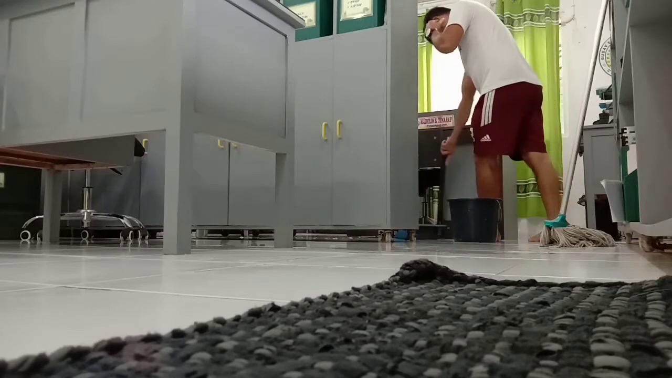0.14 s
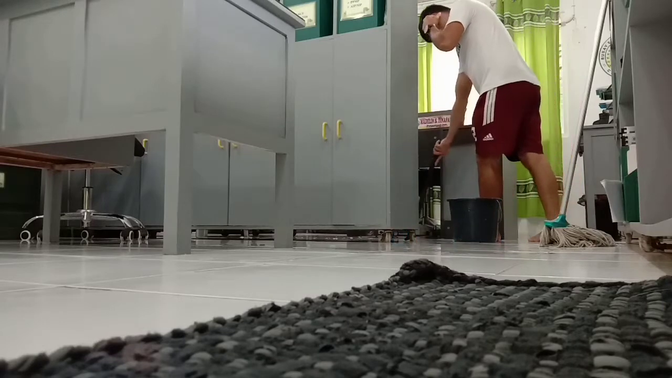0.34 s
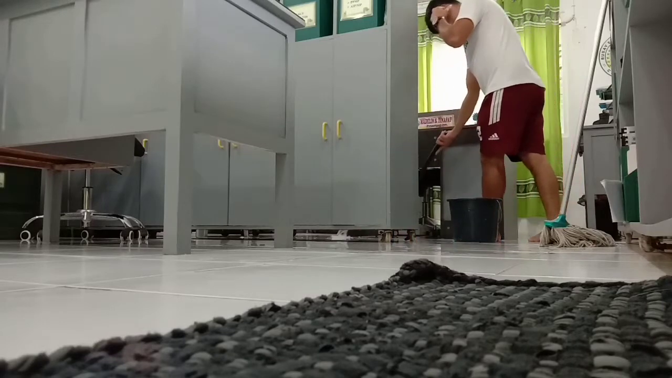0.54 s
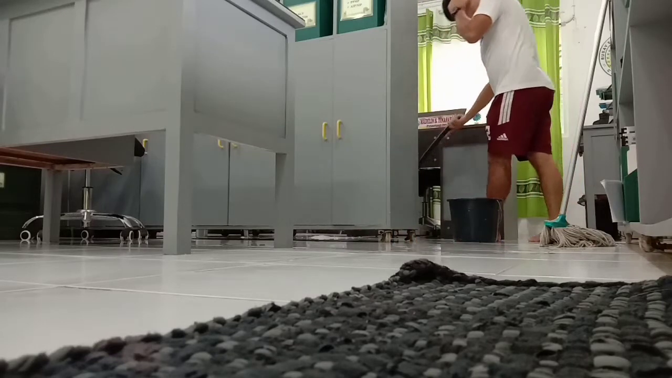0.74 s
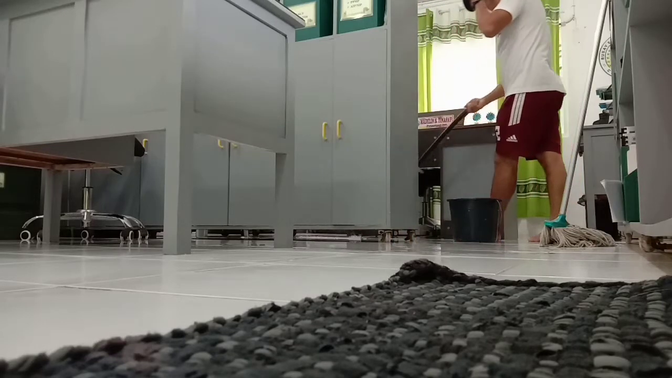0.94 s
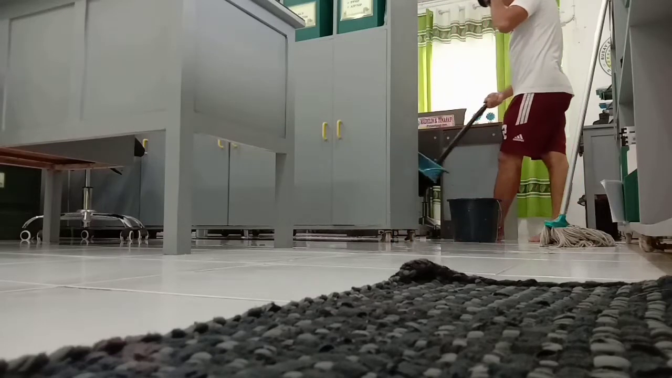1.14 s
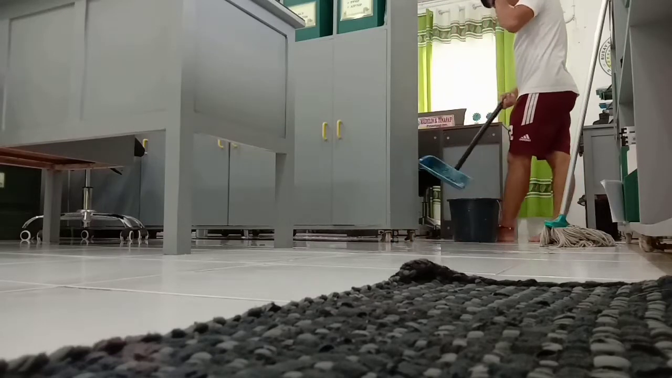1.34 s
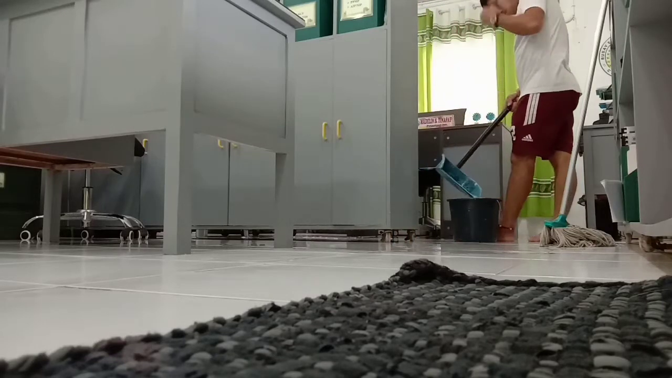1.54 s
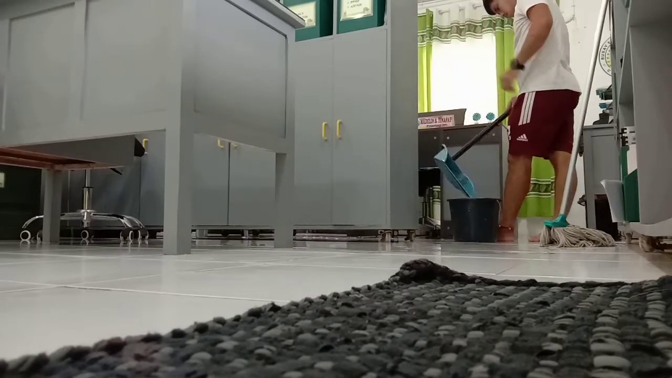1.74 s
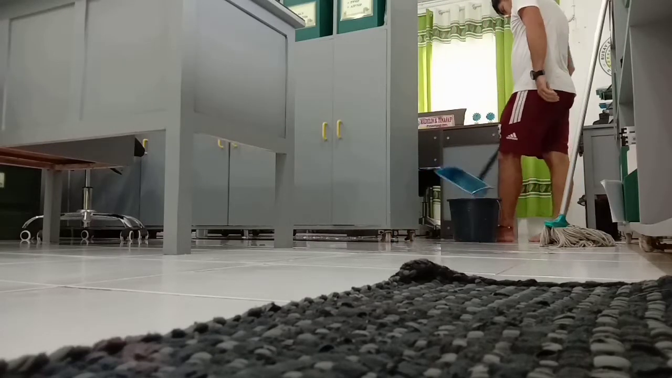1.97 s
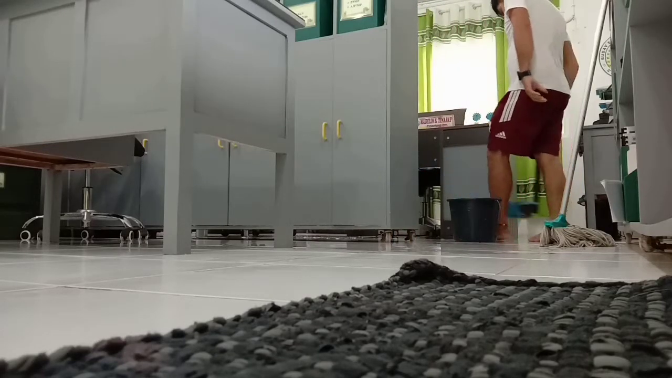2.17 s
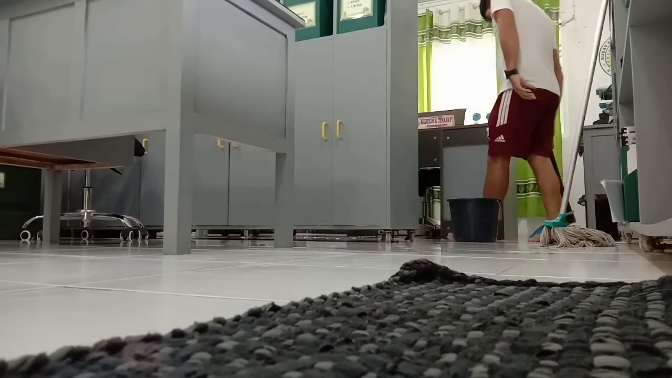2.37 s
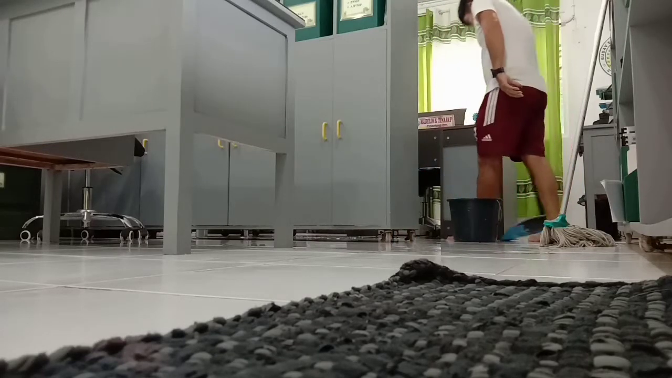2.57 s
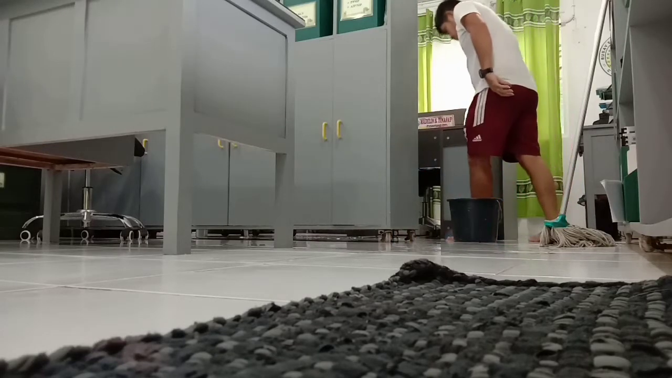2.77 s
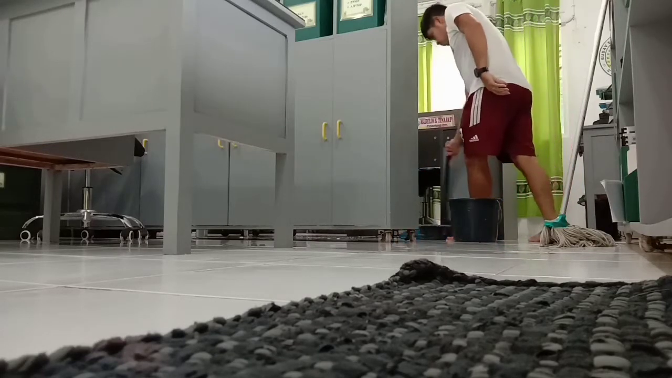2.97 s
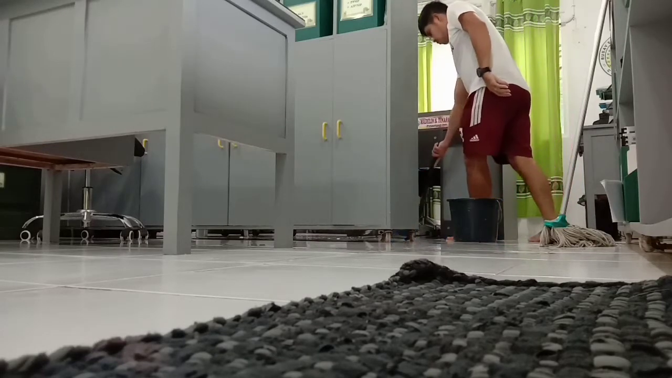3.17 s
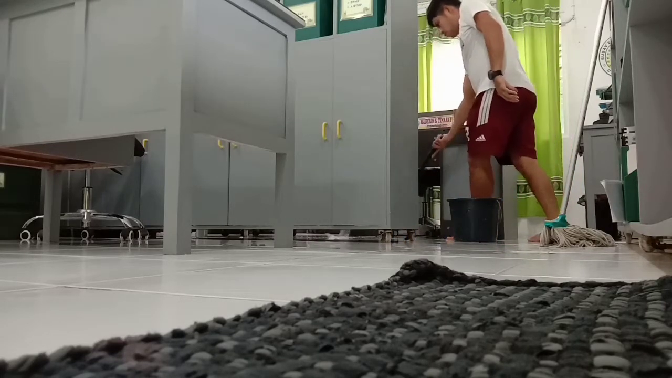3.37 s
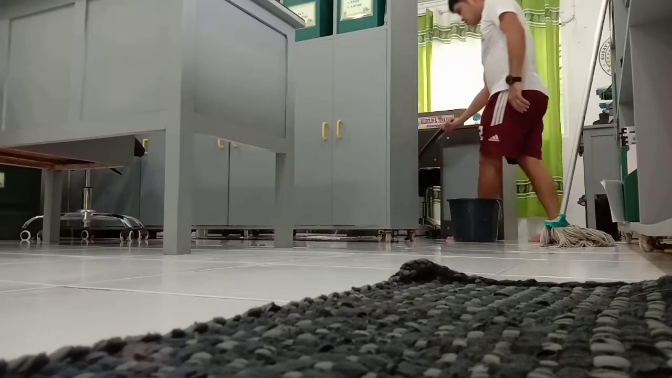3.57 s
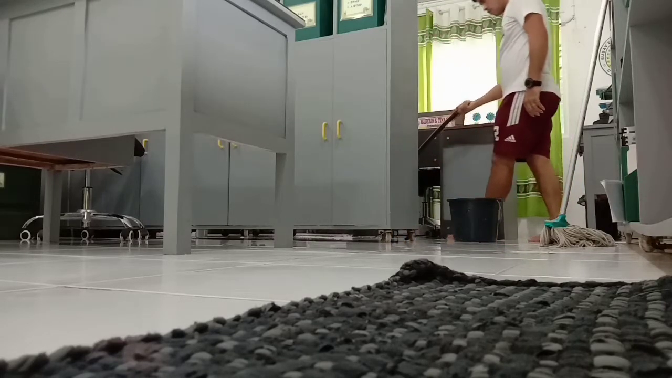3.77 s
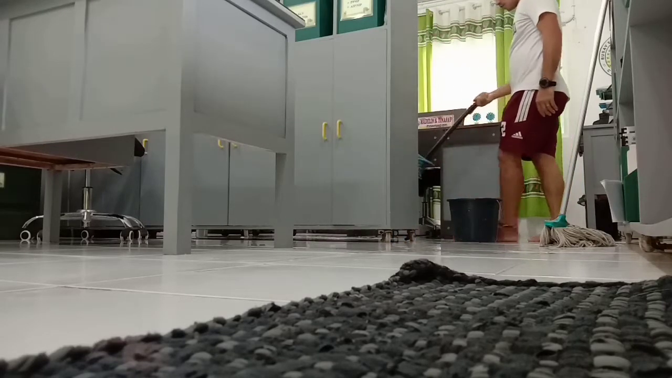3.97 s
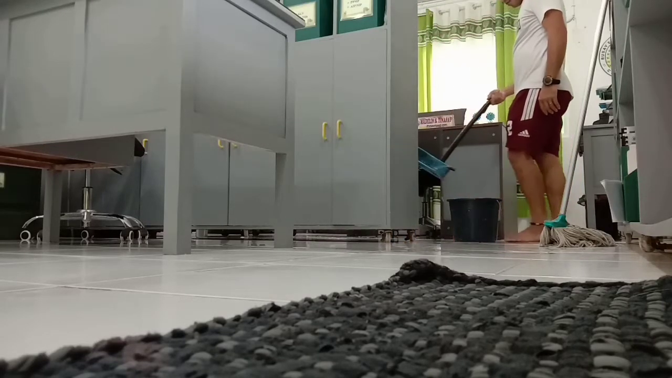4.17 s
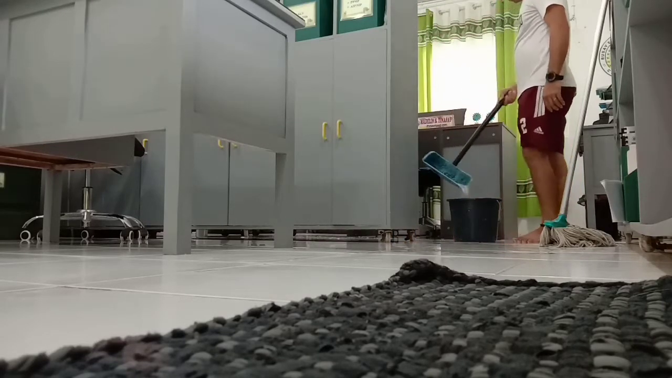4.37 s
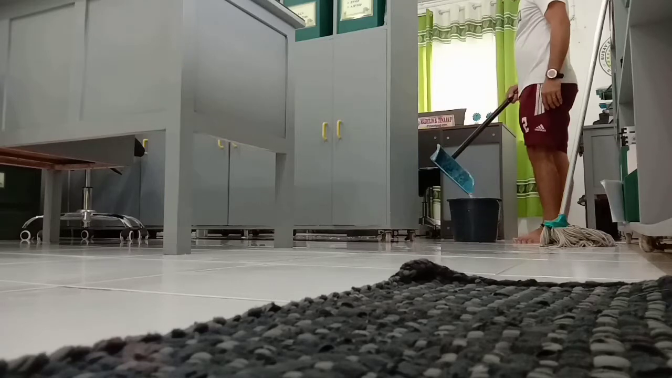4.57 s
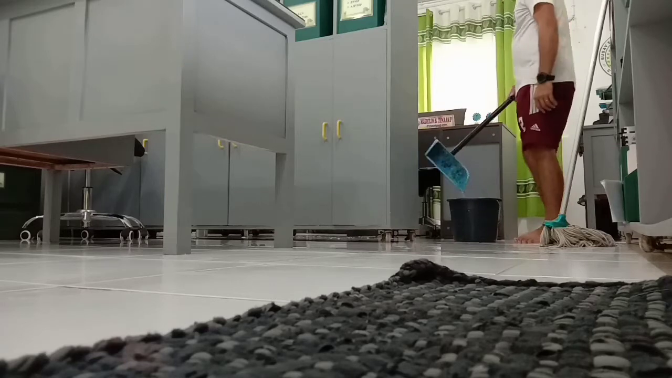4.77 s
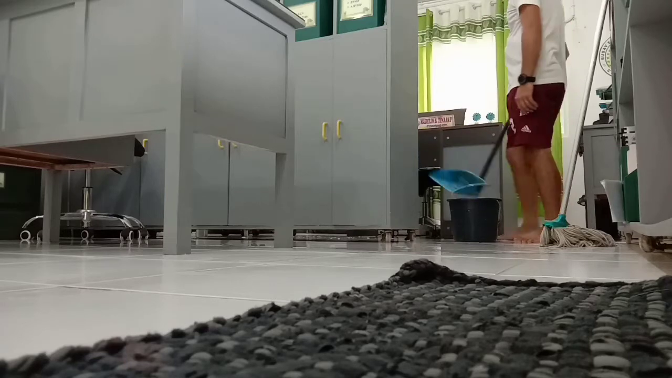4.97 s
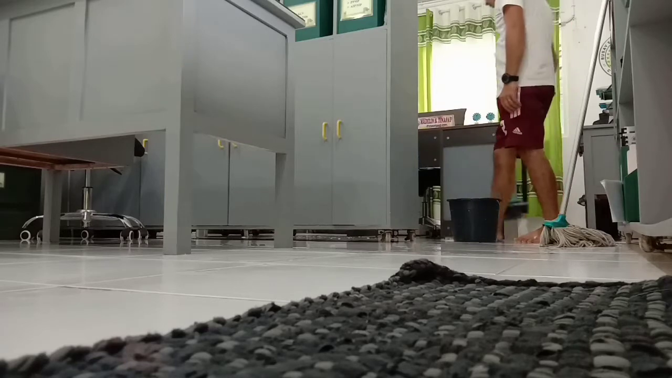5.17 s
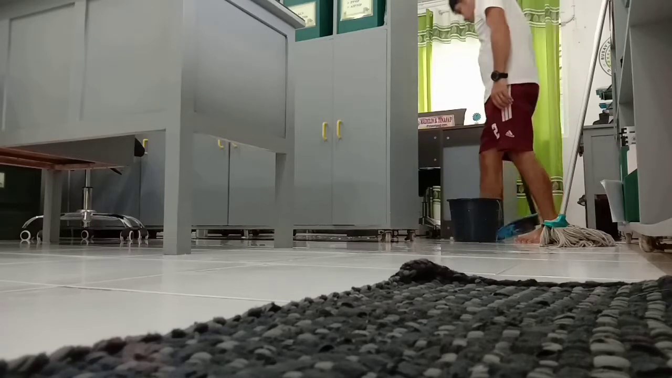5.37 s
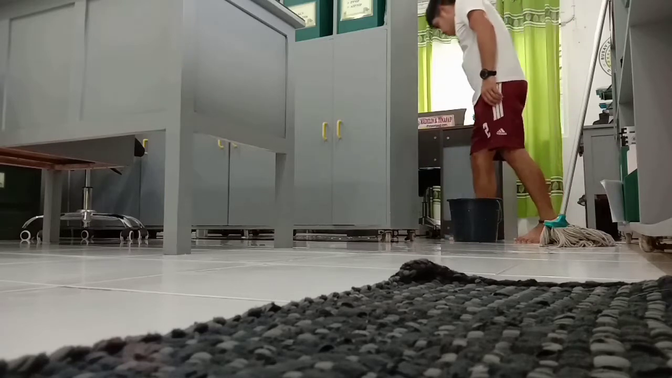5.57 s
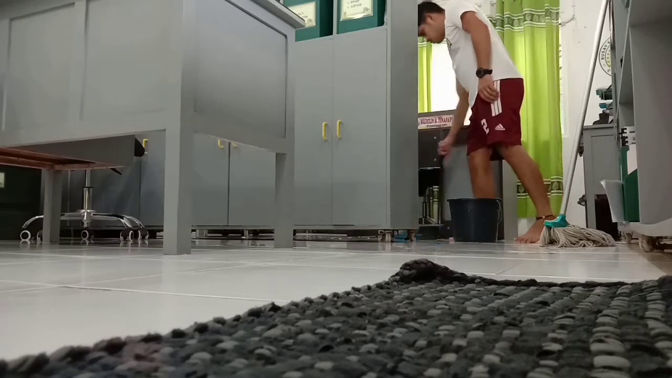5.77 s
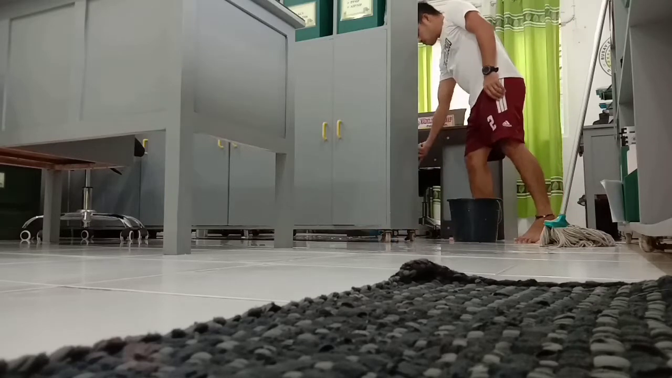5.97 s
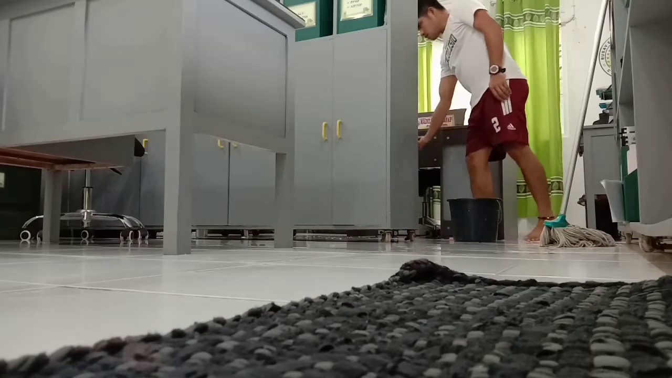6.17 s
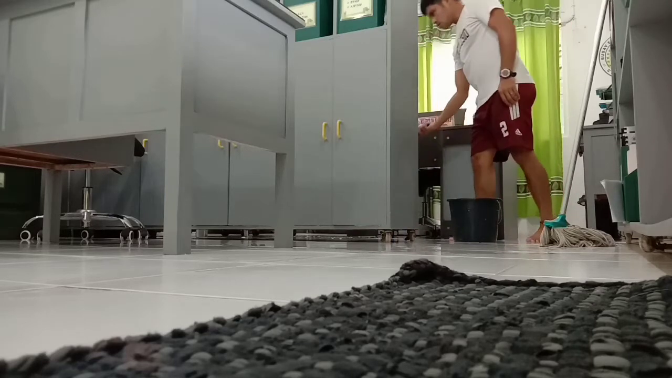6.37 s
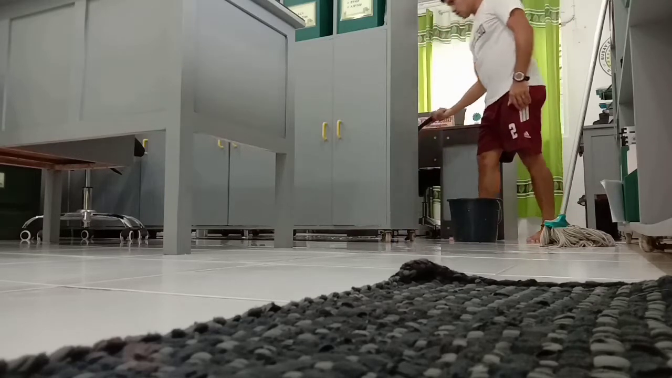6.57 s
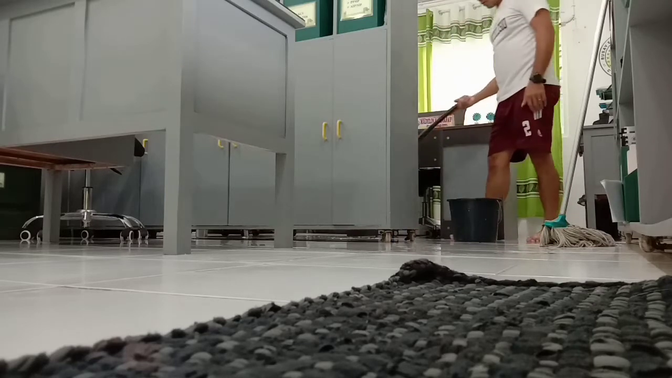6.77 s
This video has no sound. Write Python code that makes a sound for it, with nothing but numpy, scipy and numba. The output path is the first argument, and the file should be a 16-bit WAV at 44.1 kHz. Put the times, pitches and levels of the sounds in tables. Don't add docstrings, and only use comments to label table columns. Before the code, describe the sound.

Short hollow plastic knocks, a scrape, light trickling drops, then a splashing, gurgling pour into a bucket. The pattern repeats with harder banging and longer scraping, a second pour, and a final bright crack and scrape before quiet with a few drops and a faint distant bird. Heard from floor level in a reverberant room, treble dulled and mids boxy, over soft rain noise and faint mains hum.

```python
import sys
import numpy as np
from scipy import signal
from scipy.fft import rfft, irfft
from scipy.io import wavfile
from scipy.ndimage import uniform_filter1d
from numba import njit

SR = 44100
rng = np.random.default_rng(int(sys.argv[2]) if len(sys.argv) > 2 else 0)


def amplitude_ratio(level_db):
    exponent = np.asarray(level_db, float) / 20
    return 10 ** exponent


def bounce(signal):
    frames = np.transpose(np.atleast_2d(signal))
    limited = np.clip(frames, -1, 1)
    pcm = np.round(limited * 32767).astype(np.int16)
    wavfile.write(sys.argv[1], SR, pcm)


N = 300762


def level(x, db):
    return x * amplitude_ratio(db) / np.sqrt(np.mean(x ** 2))


def on_log(points, hz):
    point_hz, value = np.array(points).T
    return np.interp(np.log(hz + 1), np.log(point_hz), value)


def colour(x, points):
    cep = irfft(np.log(amplitude_ratio(on_log(points, np.arange(4097) * SR / 8192))))
    cep[1:4096] *= 2
    cep[4097:] = 0
    return signal.fftconvolve(x, irfft(np.exp(rfft(cep))))[:len(x)]


def band(x, lo_hz, hi_hz, order=2):
    return signal.sosfilt(signal.butter(order, [lo_hz, hi_hz], "band", fs=SR, output="sos"), x)


def walk(rate_hz):
    hold = int(SR / rate_hz)
    steps = np.repeat(rng.standard_normal(N // hold + 1), hold)
    return 1.3 * uniform_filter1d(uniform_filter1d(steps, hold), hold)[:N]


def sizes(chance, scatter_db):
    return amplitude_ratio(-scatter_db * np.log(1 - .97 * chance))


def ramp(start_s, end_s, up_db_per_s, down_db_per_s):
    t = np.arange(N) / SR
    early_s, late_s = np.clip(start_s - t, 0, None), np.clip(t - end_s, 0, None)
    return amplitude_ratio(-up_db_per_s * early_s - down_db_per_s * late_s)


@njit
def rings(n, start, turn, cycles, size, glide, swell):
    out = np.zeros(n)
    for g in range(len(start)):
        span = int(cycles[g] / turn[g]) + 2
        phase = 0.
        for i in range(min(span, n - start[g])):
            phase += turn[g] * (1 + glide[g] * i / span)
            envelope = (1 - np.exp(-swell * i / span)) ** 2 * np.exp(-6 * i / span)
            out[start[g] + i] += size[g] * envelope * np.sin(2 * np.pi * phase)
    return out


# f/Hz, level/dB
PLACE_COLOUR = [(1000, 0), (1170, 2.5), (1250, 9), (1350, 2.5), (1600, -10), (5200, -13), (6350, -8),
                (6600, -19), (7000, -10), (7500, -13), (8100, -22.5), (12500, -32), (14100, -28),
                (15000, -16)]


def listening_place(x):
    return colour(x, PLACE_COLOUR)


def drops(table, cycles, glide, gain_db, swell=24.):
    s, db, hz = np.transpose(table)
    size = amplitude_ratio(db - on_log(PLACE_COLOUR, hz) + gain_db)
    return rings(N, (s * SR).astype(np.int64), hz / SR, cycles + 0 * hz, size, glide + 0 * hz, swell)


def pan(push, modes):
    out = 0
    for k, (hz, db, t60_s) in enumerate(modes):
        pole = np.exp(2j * np.pi * hz / SR - np.log(1000) / (t60_s * SR))
        out = out + (-1) ** k * amplitude_ratio(db) * signal.lfilter([1], [1, -pole], push).imag
    return out


# f/Hz, level/dB, t60/s
BODY_MODES = [(210, -15, 0.041), (325, -7.5, 0.026), (414, -6, 0.023), (527, -7, 0.066),
              (631.5, -5.5, 0.078), (766, 4, 0.035), (943, 6.5, 0.023)]


def pan_body(push):
    return pan(push, BODY_MODES)


# f/Hz, level/dB, t60/s
LIP_MODES = [(1130, 12, 0.067), (1462, 0, 0.048), (1970, 16.5, 0.0071), (2260, -24, 0.051)]


def pan_lip(push):
    return pan(push, LIP_MODES)


# t/s, body peak level/dB, thud rel level/dB, lip rel level/dB, crack rel level/dB
KNOCKS = [(0.04, -15, -32, -12, 0.5), (0.075, -21.5, -28, 0.5, -3), (0.165, -20.5, -14, -4.5, 1.5),
          (0.186, -38, -12, 1, -15), (0.222, -38, -12, -9, -7), (2.402, -15, -14.5, -15, 2.5),
          (2.424, -22, -12, -27, 6), (2.446, -23, -24, -22, -4), (2.629, -6.5, -20, -17, -19),
          (2.655, -12, -1, -9, -2), (2.874, -18, -20, 0, 3), (2.894, -21, -2.5, -0.5, -17),
          (2.914, -14.5, -5.5, -10, 3), (3.018, -13, -25, -10.5, -32), (3.048, -27, -48, 3.5, -16),
          (3.111, -20, -41, -7, -24), (5.385, -13.5, -30, -11, -3), (5.403, -27, -5, -13, -9),
          (5.641, -35, -23, 8, 16), (5.6894, -15.5, -20, 7, 15), (5.709, -23, -28, -9, -2),
          (5.729, -17, -6.5, -17, -13), (5.762, -42, -31, -2, -3)]


def knocks():
    hollow, thud, lip, crack = np.zeros((4, N + SR))
    t = np.arange(2000) / SR
    chance = rng.standard_normal((len(KNOCKS), 2, len(t))) * (1 - np.exp(-t / 0.00088))
    for (s, db, thud_db, lip_db, crack_db), (push, grit) in zip(KNOCKS, chance):
        at = slice(int(s * SR), int(s * SR) + len(t))
        hollow[at] += amplitude_ratio(db) * push * np.exp(-t / 0.0025)
        thud[at] += amplitude_ratio(db + thud_db) * grit * np.exp(-t / 0.0028)
        lip[at] += amplitude_ratio(db + lip_db) * push * np.exp(-t / 0.0027)
        crack[at] += amplitude_ratio(db + crack_db) * grit * np.exp(-t / 0.0055)
    body = amplitude_ratio(-27.5) * pan_body(hollow)
    edge = amplitude_ratio(-28.5) * band(pan_lip(lip), 260, 9000)
    noise = amplitude_ratio(19.0) * band(thud, 195, 443) + amplitude_ratio(2.0) * band(crack, 1290, 8300)
    return (body + edge + noise)[:N] + panels() + booms()


# t/s, peak level/dB, f/Hz
PANELS = [(.003, -45, 1200), (.015, -29, 805), (.022, -38, 395), (.038, -28.5, 1180), (.04, -18, 765),
          (.055, -31, 394), (.072, -22.5, 1025), (.078, -33, 1270), (.098, -34, 944), (.17, -49, 704),
          (.184, -25.5, 680), (.2, -27, 1247), (.275, -50, 1360), (2.404, -18.5, 896), (2.419, -17, 483),
          (2.423, -16.5, 955), (2.436, -26, 906), (2.43, -26, 326), (2.446, -28, 500), (2.465, -42, 930),
          (2.51, -32, 1220), (2.63, -14, 362), (2.632, -13, 744), (2.652, -15, 813), (2.652, -15, 380),
          (2.685, -16, 764), (2.705, -15.5, 1235), (2.803, -20, 1235), (2.76, -30, 1250),
          (2.825, -19, 1260), (2.845, -18.5, 1195), (2.875, -10.5, 1130), (2.878, -11, 875),
          (2.894, -21, 1130), (2.914, -28, 1170), (2.94, -23, 1085), (3.018, -15, 881), (3.048, -16, 900),
          (3.05, -27, 407), (3.118, -29.5, 990), (5.386, -16, 937), (5.397, -20.5, 920), (5.39, -18, 505),
          (5.4, -32, 485), (5.415, -28, 384), (5.43, -38, 526), (5.44, -23, 944), (5.645, -18.5, 1255),
          (5.693, -2.5, 1250), (5.6895, -7.5, 970), (5.7085, -12, 1307), (5.725, -10, 778),
          (5.73, -32, 252), (5.745, -21, 780), (5.758, -14, 1334), (5.801, -17.5, 1217), (5.84, -29, 1350),
          (2.403, -37, 2210), (2.403, -31.5, 2720), (2.405, -38, 1680), (5.69, -22, 1870),
          (5.386, -33, 2260)]


def panels():
    ring_s = 0.03
    return drops(PANELS, ring_s * np.transpose(PANELS)[2], glide=0, gain_db=1.5, swell=36.6)


# t/s, peak level/dB, f/Hz
BOOMS = [(.17, -41, 119), (2.405, -42, 122), (2.41, -39, 220), (2.405, -32, 316), (2.44, -40, 124.6),
         (2.624, -26, 122), (2.623, -21, 272), (2.644, -33, 210), (2.66, -27, 79), (2.72, -33, 270),
         (2.861, -35, 240), (2.896, -32, 111), (3.009, -32.5, 267), (5.388, -32, 316), (5.4, -35, 233),
         (5.688, -34, 272), (5.712, -33, 224), (5.761, -46, 270)]


def booms():
    ring_s = 0.088
    return drops(BOOMS, ring_s * np.transpose(BOOMS)[2], glide=0, gain_db=3.5, swell=11.3)


# t/s, hold/s, pressure level/dB, lip rel level/dB, rasp rel level/dB
STROKES = [(0.0, 0.025, -24.5, -17, -2.5), (0.061, 0.034, -32.5, 7, -1), (0.145, 0.025, -22, -11, -10),
           (2.403, 0.017, -19, -33, -12), (2.427, 0.03, -40.5, -6, 0), (2.495, 0.1, -32, -1, -3),
           (2.604, 0.018, -43, -3, 13), (2.623, 0.022, -21, -18, 2.5), (2.647, 0.12, -26.5, -14, -2.5),
           (2.758, 0.13, -29, 8, -1), (2.883, 0.012, -22.5, -22, -6), (2.93, 0.12, -29.5, -11, -2),
           (3.016, 0.035, -20.5, -10, -7), (3.066, 0.034, -36.5, -21, 2.5), (5.385, 0.032, -19, -25, -8.5),
           (5.42, 0.048, -37, -5, 1.5), (5.442, 0.087, -30.5, -6, -5.5), (5.517, 0.076, -36.5, -13, 5.5),
           (5.689, 0.0051, -20, -16, -5), (5.706, 0.012, -14.5, -19, -4), (5.767, 0.098, -32.5, 4.5, -8.5),
           (0.238, 0.074, -55.5, 9, 10), (5.591, 0.081, -36.5, 7, 7)]


def strokes():
    press_db_per_s, ease_db_per_s = 3194, 303
    power = 0
    for s, hold_s, db, lip_db, rasp_db in STROKES:
        gains = amplitude_ratio(db + np.array([[0], [lip_db], [rasp_db]]))
        power = power + (gains * ramp(s, s + hold_s, press_db_per_s, ease_db_per_s)) ** 2
    return np.sqrt(power)


def scrape():
    hollow, lip, rasp = strokes()
    spray = rasp ** 1.056 * amplitude_ratio(-8)
    slip, size, side = rng.random((3, N))
    slips_per_s = 2000
    slips = (slip < slips_per_s / SR) * sizes(size, 3.2) * np.sign(side - .5) * amplitude_ratio(2.56 * walk(70))
    body = hollow * level(pan_body(slips), -4.0)
    belly = hollow * level(band(slips, 270, 640), -18.5)
    edge = lip * level(band(pan_lip(slips), 1010, 19000), -8.5)
    grate = rasp * level(band(slips, 1440, 3020), 3.18)
    spatter = spray * bubbles(3420, 9900, rate_hz=1600, cycles=6.3, scatter_db=3.4, gain_db=7.56)
    return body + belly + edge + grate + spatter


def bubbles(lo_hz, hi_hz, rate_hz, cycles, scatter_db, gain_db):
    when, pitch, size = rng.random((30000, 3))[:int(rate_hz * N / SR)].T
    hz = lo_hz * (hi_hz / lo_hz) ** pitch
    start = (when * N).astype(np.int64)
    swarm = rings(N, start, hz / SR, 3 * cycles + 0 * hz, sizes(size, scatter_db), 0.7 + 0 * hz, 26.0)
    return level(swarm, gain_db)


def surges(table, narrow_db):
    kind = np.arange(4)[:, None]
    power = 0
    for s, rise_s, fall_s, db, fine in table:
        gains = amplitude_ratio(db - narrow_db * (kind - fine) ** 2)
        power = power + (gains * ramp(s, s, 20 / rise_s, 20 / fall_s)) ** 2
    return power


# peak t/s, rise/s, fall/s, flow level/dB, fineness [0 gurgle - 3 mist]
SWISHES = [(.608, 0.07, .12, -42, 1.88), (.74, 0.09, 0.18, -36.5, 1.62), (.87, .11, 0.16, -43, 1.6),
           (.908, 0.05, 0.099, -44.5, 2.24), (1.075, .04, 0.09, -53, 2.2), (1.312, 0.05, 0.09, -50.5, 2.2),
           (1.455, 0.01, 0.07, -43, 2.2), (3.35, .05, 0.28, -54, 2.2), (3.445, 0.094, 0.11, -50.5, 2.6),
           (3.58, 0.11, 0.07, -40.5, 2), (3.66, 0.1, 0.05, -41.5, 2.05), (3.69, 0.033, 0.041, -56, 3),
           (4.33, .03, 0.15, -44, 2.1), (4.382, 0.046, 0.12, -47.5, 2.3), (4.448, 0.085, .11, -46, 1.9),
           (.75, 0.05, .07, -55, 2.9), (4.55, .03, 0.098, -42, 3.1), (4.64, .04, 0.11, -49, 3.1),
           (.605, 0.014, 0.04, -44, 3.1), (.87, .02, .09, -44.5, 3.1), (2.65, .04, .1, -41, 3.2),
           (5.72, .035, .1, -35, 3.1), (5.6, .15, .1, -53, 3.2), (3.05, .05, .06, -54, 3.2),
           (2.91, .05, .08, -52, 3.2)]


def swishes():
    return surges(SWISHES, narrow_db=15.5)


# peak t/s, rise/s, fall/s, flow level/dB, fineness [0 gurgle - 3 mist]
POURS = [(1.47, 0.014, 0.18, -36, -1.65), (1.576, 0.12, 0.078, -51, 3), (1.632, 0.11, 0.23, -37, 1.38),
         (1.738, 0.22, 0.45, -43, 1.5), (1.8, 0.068, 0.1, -50, 0.5), (1.878, 0.024, 0.14, -43.5, 1.5),
         (1.966, .08, 0.014, -63, -4), (2.02, 0.15, 0.074, -51, -1.5), (4.476, 0.011, 0.098, -39, 1.5),
         (4.54, 0.075, 0.13, -33, 1.56), (4.64, 0.16, 0.099, -34, 1.5), (4.74, 0.018, 0.2, -40.5, 1.6),
         (4.9, 0.53, 0.13, -37, -1.77), (4.82, 0.072, 0.19, -46.5, 0.8)]


def pours():
    return surges(POURS, narrow_db=6.5)


def water():
    gurgle, splash, fizz, mist = np.sqrt(swishes() + pours())
    flow = gurgle * bubbles(480, 1200, rate_hz=500, cycles=9, scatter_db=3, gain_db=4.5)
    flow = flow + splash * bubbles(1400, 3500, rate_hz=2200, cycles=7, scatter_db=4.5, gain_db=2.5)
    flow = flow + fizz * bubbles(3400, 7800, rate_hz=1500, cycles=5, scatter_db=4, gain_db=5.5)
    flow = flow + mist * bubbles(6530, 14800, rate_hz=2400, cycles=8.5, scatter_db=3.5, gain_db=16.5)
    return flow + single_drops()


# t/s, peak level/dB, f/Hz
PLOPS = [(1.486, -32, 960), (1.519, -29.5, 588), (1.626, -28, 715), (1.659, -29, 1000), (1.688, -30.5, 620),
         (1.755, -22.5, 648), (1.789, -27.5, 980), (1.84, -18, 703), (1.868, -26, 710), (1.899, -33, 845),
         (3.545, -36, 780), (3.872, -40, 810), (3.885, -34.5, 810), (3.91, -38, 805), (3.96, -43, 830),
         (4.542, -31, 663), (4.508, -33, 1230), (4.53, -37, 1280), (4.542, -31, 1220), (4.572, -28, 1170),
         (4.585, -21, 1140), (4.613, -25, 1100), (4.645, -35, 1260), (4.662, -40, 1200), (4.691, -42, 1200),
         (4.742, -25.5, 790), (4.76, -25.5, 716), (4.785, -28, 753), (4.81, -33, 720), (4.869, -31, 570),
         (4.885, -28, 614), (4.91, -28.5, 850), (4.939, -34.5, 562), (6.257, -34.5, 804),
         (.028, -18.5, 383), (1.5, -32, 410), (1.64, -34, 424), (4.475, -38.5, 388), (4.57, -36.5, 393),
         (4.65, -35.5, 348), (4.82, -34.5, 414), (6.299, -35, 800), (4.6, -30, 950), (4.64, -33, 653),
         (1.6, -40, 600), (1.71, -31, 603), (3.41, -29, 1205), (3.435, -37, 1250)]
# t/s, peak level/dB, f/Hz
PLINKS = [(0.5594, -36, 4300), (0.605, -32, 3680), (0.7494, -29.5, 2080), (0.7994, -46, 4380),
          (0.8594, -38, 4380), (0.8994, -50, 4650), (0.9697, -39, 4760), (1.294, -40, 3970),
          (1.325, -43, 4500), (1.5963, -25, 2060), (1.642, -22, 2120), (1.6694, -26, 2000),
          (1.934, -28.5, 2470), (4.4194, -33, 3800), (4.4787, -31, 4620), (4.59, -23, 1930),
          (4.635, -24.5, 2040), (4.7494, -28, 2060), (6.6433, -40, 2240), (.585, -41, 2580),
          (.62, -43, 3460), (.715, -35, 3000), (.76, -33, 2800), (.845, -39, 2920), (.878, -31, 3260),
          (.9, -41, 3660), (1.632, -34, 4060), (1.72, -24.5, 4100), (1.844, -32, 3740), (4.516, -31, 2500),
          (4.54, -29, 1760), (4.627, -21, 1570), (4.66, -36, 2880), (4.82, -34, 1960), (4.92, -41, 3400),
          (5.41, -24, 3220), (5.444, -30, 1790), (5.62, -33, 2950), (5.675, -30, 1990)]
# t/s, peak level/dB, f/Hz
DROPS = [(0.023, -18, 6860), (0.1526, -28.5, 3050), (0.6194, -29, 5600), (0.7233, -21, 6160),
         (.743, -18, 5900), (.7695, -23, 5760), (.803, -35, 6000), (.908, -35, 6040), (0.758, -23, 6700),
         (0.791, -27, 5570), (0.9155, -17, 6420), (1.0715, -40, 6570), (1.452, -21, 5500),
         (1.468, -21, 5700), (1.48, -21.5, 6510), (1.5, -24, 5800), (3.605, -22, 6000), (1.46, -22, 6400),
         (1.46, -19.5, 8030), (1.552, -26, 7540), (1.71, -19, 7260), (1.712, -21, 4500), (1.78, -28, 7800),
         (1.5509, -27, 6000), (1.638, -25, 6200), (1.711, -18, 5800), (1.7494, -37, 6160),
         (1.879, -18.5, 7100), (1.8826, -21, 5200), (1.9, -27, 6100), (2.915, -11.5, 6140),
         (3.019, -20, 3670), (3.5169, -29.5, 4730), (4.358, -30, 7950), (4.485, -34, 7300),
         (4.505, -30, 7300), (4.74, -24, 7350), (4.803, -29, 7540), (4.803, -25, 5930), (3.021, -20, 7240),
         (4.4675, -21.5, 7550), (4.4797, -18, 4450), (4.52, -30, 5850), (4.546, -16, 7600),
         (4.5794, -20, 6000), (4.6244, -22, 6000), (4.7386, -26, 3150), (4.803, -26, 4200),
         (5.6945, -10, 6720)]
# t/s, peak level/dB, f/Hz
TICKS = [(.728, -38, 8800), (0.85, -36, 8700), (.805, -41, 10200), (0.92, -34, 7400), (.59, -46, 11000),
         (1.072, -52, 8900), (1.095, -51, 8100), (1.315, -50, 9300), (3.4, -62, 8200), (4, -45, 8750),
         (3.4, -54, 10300), (2.4, -33, 8500), (1.978, -37, 10300), (1.978, -34, 11500), (1.6, -25, 7100),
         (.868, -41, 10300), (0.77, -41, 10200), (1.979, -42, 14000), (1.6, -47, 7900), (3.8, -35.5, 11700),
         (4.545, -44, 14100), (4.62, -24.5, 10300)]


def single_drops():
    large = drops(PLOPS, 18.8, glide=0.13, gain_db=0.27)
    middle = drops(PLINKS, 36, glide=0.1, gain_db=1, swell=12.)
    small = drops(DROPS, 25, glide=0.06, gain_db=3.5, swell=9.)
    finest = drops(TICKS, 22, glide=0.15, gain_db=7.5, swell=9.)
    return large + middle + small + finest


def clumpy(noise, lo_hz, hi_hz):
    slow = uniform_filter1d(uniform_filter1d(noise, size=500), size=500)
    return band(noise, lo_hz, hi_hz) * amplitude_ratio(2.2 * slow / slow.std())


# f/Hz, t60/s
ROOM_T60 = [(100, 0.23), (500, 0.37), (1200, 0.46), (4000, 0.63), (8000, 0.39), (14000, 0.11)]


def room(tail_db, build_s, early_db):
    t = np.arange(SR // 2) / SR
    edges_hz = 64 * 2 ** np.arange(0, 8.1, .5)
    tail = 0
    for lo, hi in zip(edges_hz, edges_hz[1:]):
        tail = tail + clumpy(rng.standard_normal(len(t)), lo, hi) * amplitude_ratio(-60 * t / on_log(ROOM_T60, lo))
    tail = tail * (1 - np.exp(-t / build_s)) * (1 + amplitude_ratio(early_db) * np.exp(-t / 0.058))
    tail = tail * amplitude_ratio(tail_db) / np.sqrt(np.sum(tail ** 2))
    tail[0] = 1
    return tail


# f/Hz, level/dB per Hz
RAIN_COLOUR = [(25, -30), (45, -12), (70, -2), (120, 0), (250, 0), (560, -2), (700, -6.5), (820, 2),
               (950, -1.5), (1400, -2), (1900, -5.5), (5000, -7.5), (10000, -7), (13800, -8), (15000, -15)]


def rain_and_cavity():
    edges_hz = 22.5 * 2 ** np.arange(0, 9.8, .5)
    swell_db = .5 * walk(3)
    rain = 0
    for lo, hi in zip(edges_hz, edges_hz[1:]):
        flicker_db = 2.8 * walk(11) if lo < 1200 else 1.7 * walk(16)
        rain = rain + band(rng.standard_normal(N), lo, hi) * amplitude_ratio(swell_db + flicker_db)
    cavity = level(band(rain, 1205, 1300) * amplitude_ratio(2 * swell_db), -69)
    return level(colour(rain, RAIN_COLOUR), -44.5) + cavity


# f/Hz, level/dB
HUM = [(118, -65.5), (236, -70), (535, -72)]


def hum():
    t = np.arange(N) / SR
    return sum(amplitude_ratio(db + 3 * walk(5)) * np.sqrt(2) * np.sin(2 * np.pi * hz * t) for hz, db in HUM)


# start t/s, end t/s, f/Hz, level/dB
CHIRPS = [
    (6.56, 6.7, 5660, -52.5),
    (6.75, 6.78, 5660, -58),
    (6.43, 6.48, 4350, -60),
    (6.52, 6.56, 4300, -60),
    (6.61, 6.66, 4500, -61),
]


def bird():
    t = np.arange(N) / SR
    waver = walk(60)
    bend = np.cumsum(45 * waver) / SR
    notes = 0
    for start, end, hz, db in CHIRPS:
        arch = np.sqrt(np.clip((t - start) * (end - t), 0, 1)) * 2 / (end - start)
        notes = notes + amplitude_ratio(db) * arch * np.sin(2 * np.pi * (hz * t + bend))
    return amplitude_ratio(3 * waver) * notes


def scene():
    hits = signal.fftconvolve(amplitude_ratio(-0.5) * knocks(), room(1.2, 0.0055, 0.83))[:N]
    scrapes = signal.fftconvolve(amplitude_ratio(-4) * scrape(), room(0.16, 0.00028, 0.46))[:N]
    splashes = signal.fftconvolve(amplitude_ratio(-2.0) * water(), room(0.78, 0.0018, 8.7))[:N]
    near = band(hits + scrapes + splashes, 57, 18000)
    return listening_place(near + rain_and_cavity() + hum() + bird())[None]


def roll_off(x):
    return signal.sosfilt(signal.butter(12, 16660, fs=SR, output="sos"), x)


def record(dry):
    soft = np.tanh(1.1 * dry) / 1.1
    low_pass = signal.ellip(10, .2, 60, 15520, fs=SR, output="sos")
    mix = signal.sosfilt(low_pass, soft)
    return roll_off(mix)


dry = scene()
out = record(dry)
bounce(out)
```